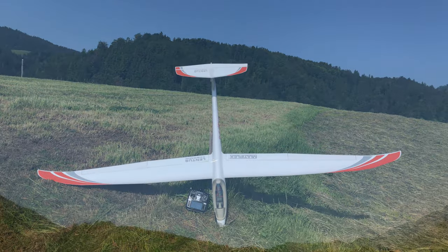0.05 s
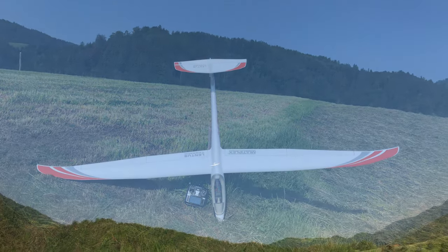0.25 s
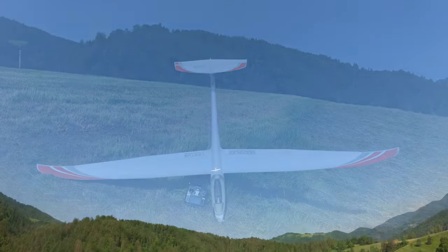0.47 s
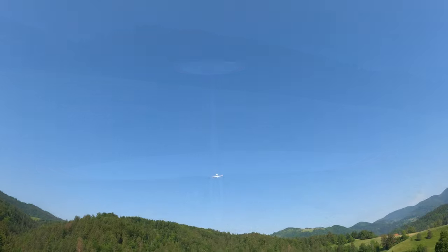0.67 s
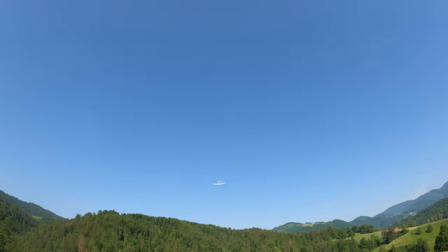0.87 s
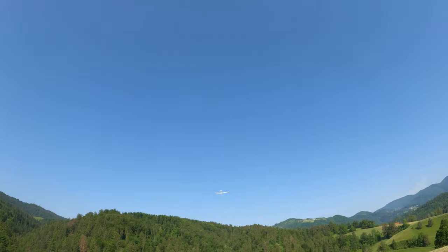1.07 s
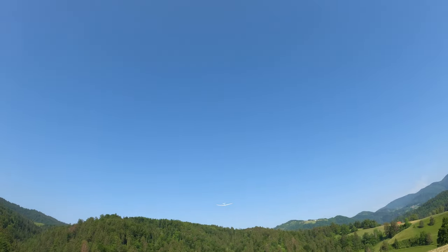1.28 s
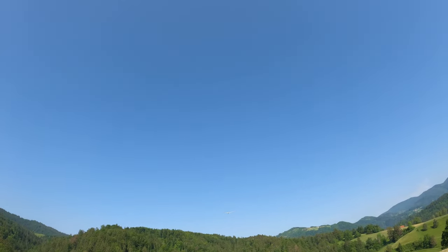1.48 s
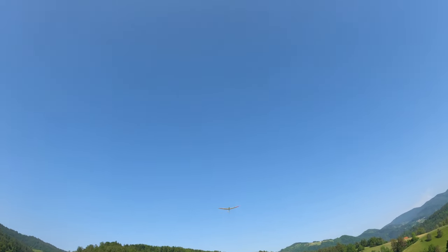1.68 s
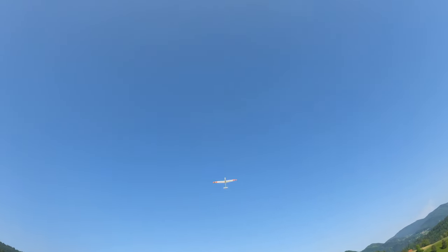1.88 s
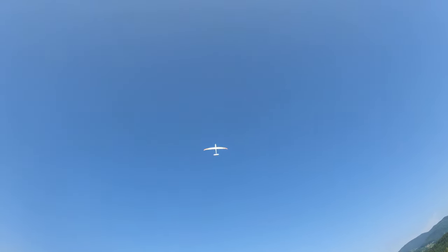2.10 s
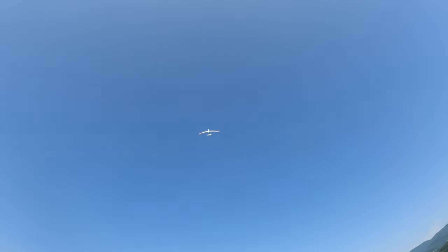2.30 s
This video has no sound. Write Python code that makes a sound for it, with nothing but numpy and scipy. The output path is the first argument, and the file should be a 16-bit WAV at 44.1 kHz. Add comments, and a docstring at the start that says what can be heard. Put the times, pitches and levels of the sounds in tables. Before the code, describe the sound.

A model glider's airy whistle rises and falls as it passes, over wind and chirping insects.

```python
"""Model glider over a meadow

A model glider dives toward the microphone and passes overhead. Its wings rush and air
whistles across its gaps, rising with speed, then falling as it goes by. Insects chirp and
tick in the summer grass, a far bird calls once, and wind buffets the microphone."""
import sys
import numpy as np
from scipy import signal
from scipy.fft import rfft, irfft
from scipy.io import wavfile
from scipy.ndimage import uniform_filter1d

SR = 44100
rng = np.random.default_rng(int(sys.argv[2]) if len(sys.argv) > 2 else 0)


def file_out(sig):
    """Save sig as 16-bit WAV at sys.argv[1]."""
    # one column per channel
    cols = np.atleast_2d(sig).T
    # limit, then scale
    lim = np.clip(cols, -1, 1)
    pcm = np.round(lim * 32767).astype(np.int16)
    wavfile.write(sys.argv[1], SR, pcm)


N = 108045
TIME = np.arange(N) / SR


def amp(db):
    """Turns decibels into a gain."""
    return 10 ** (np.asarray(db) / 20)


def unit(x):
    """Scales a signal to an average power of 1."""
    return x / np.sqrt(np.mean(abs(x) ** 2) + 1e-20)


def colour(points, hz):
    """Reads a table of (frequency, value) along a logarithmic frequency axis."""
    known_hz, values = np.transpose(points)
    return np.interp(np.log(hz + 1), np.log(known_hz), values)


def pan(db):
    """Left and right gains that make the left side db louder."""
    return amp(np.array([[db], [-db]]) / 2)


def pair(noises, same):
    """Makes two noises partly alike, from unrelated (0) to identical (1)."""
    return np.array([noises[0], same * noises[0] + np.sqrt(1 - same ** 2) * noises[1]])


def flutter(width_hz):
    """A smooth random wobble, as complex numbers: the wider its band, the faster it moves."""
    pole = np.exp(-np.pi * width_hz * 1.55 / SR)
    noise = rng.standard_normal(N + 4096) + 1j * rng.standard_normal(N + 4096)
    return unit(signal.lfilter([1], [1, -2 * pole, pole * pole], noise)[-N:])


def tone(hz, amplitude):
    """A tone that follows a pitch curve."""
    return np.sqrt(2) * (amplitude * np.exp(2j * np.pi * np.cumsum(hz) / SR)).real


def breathy_tone(hz, width_hz, noisy):
    """A tone that is part pure, part narrow noise; noisy is the noise's share, 0 to 1."""
    return tone(hz, np.sqrt(1 - noisy) + np.sqrt(noisy) * flutter(width_hz))


def add(mix, centre_s, sound):
    """Mixes a sound in, centred on a time."""
    start = round(centre_s * SR) - len(sound) // 2
    sound = sound[max(-start, 0):]
    part = mix[max(start, 0):][:len(sound)]
    part += sound[:len(part)]


def whistle(curve, tones, waver=0.00193):
    """Tones (pitch ratio, gain [dB], width [Hz], noise share) on one wavering pitch curve."""
    times, pitches, levels = np.transpose(curve)
    hz = np.interp(TIME, times, pitches) * (1 + waver * flutter(30).real)
    outside_s = abs(TIME - np.clip(TIME, times[0], times[-1]))
    level = amp(np.interp(TIME, times, levels) - 370 * outside_s)  # fades fast beyond both ends
    return level * sum(amp(db) * breathy_tone(hz * ratio, width, noisy)
                       for ratio, db, width, noisy in tones)


def bird():
    """One faint falling note, blurred by distance."""
    # The slurred note: (time [s], base pitch [Hz], level [dB])
    note = [(.12, 2820, -49), (.145, 2590, -48), (.165, 2387, -50.5), (.22, 2380, -59)]
    return whistle(note, [(0.99, 0.01, 140, 0.15)])


def chirp(hz, second_db, third_db, fall_hz_per_s=20500, width_s=0.0053):
    """One stroke of an insect's wing: a short falling note with two faint overtones."""
    t = np.arange(-700, 700) / SR
    phase = 2 * np.pi * (np.cumsum(hz - fall_hz_per_s * t) / SR + rng.random())
    note = np.sin(phase) + amp(second_db) * np.sin(2 * phase) + amp(third_db) * np.sin(3 * phase)
    return np.exp(-(t / width_s) ** 2 / 2) * note


def far_insects(level_db=-48.5, gap_s=.034, blur_hz=130):
    """Four distant insects keep chirping, each at its own pitch and uneven pace."""
    chorus = np.zeros((2, N))
    for k, hz in enumerate(np.linspace(4373, 4853, 4)):
        gaps, sizes = 1 + .3 * rng.standard_normal((2, 100))
        times = gap_s * (np.cumsum(gaps) - rng.random())
        for s, size in zip(times, sizes):
            add(chorus[k % 2], s, size * chirp(hz, second_db=-25.5, third_db=-34))
    grass_scatter = np.array([flutter(blur_hz), flutter(blur_hz)])
    blurred = (signal.hilbert(chorus) * grass_scatter).real
    fade_in = np.minimum(0.19 + TIME / .35, 1)
    return amp(level_db) * unit(blurred + 0.21 * blurred[::-1]) * fade_in  # sides mix a little


def near_insect(pitch_hz=4618, gap_s=.032, swell_db=4.5):
    """One insect close by on the left strokes its wings in swelling phrases."""
    # Phrases of chirps: (first chirp [s], last chirp [s], relative level [dB])
    phrases = [(0.096, 0.149, -45), (0.359, 0.426, -47), (0.658, 0.783, -36.5), (1.121, 1.23, -35),
               (1.44, 1.533, -35.5), (1.882, 1.914, -39), (2.127, 2.248, -35.5), (2.384, 2.438, -40)]
    song = np.zeros(N)
    for first, last, db in phrases:
        times = np.linspace(first, last, round((last - first) / gap_s) + 1)
        for s, place in zip(times, np.linspace(-1, 1, len(times))):
            level = amp(db - swell_db * min(place, 0) ** 2)  # grows until mid-phrase
            add(song, s, level * chirp(pitch_hz, second_db=-31, third_db=-41))
    return pan(6.5) * amp(1) * song


def bush_cricket(pitch_hz=11600, step_hz=500, band_hz=900, width_s=.003):
    """Brief, very high rasps on the left that step up in pitch midway and scatter in the grass."""
    # Ticks: (time [s], relative level [dB])
    ticks = [(.235, -61), (.661, -56), (.697, -51), (.729, -49), (.768, -53), (1.024, -52), (1.057, -49),
             (1.091, -45.5), (1.132, -49), (1.448, -54), (1.483, -49), (1.522, -47), (2.055, -54),
             (2.14, -53), (2.195, -54)]
    t = np.arange(-1500, 1500) / SR / width_s  # time from a tick's centre, in widths
    grass_tail = amp(-17) * (t > 0) * np.exp(-abs(t) / 10)
    envelope = np.exp(-t * t / 2) + grass_tail
    hz = pitch_hz + step_hz * np.tanh(2 * t)
    rasps = pair([flutter(band_hz), flutter(band_hz)], same=0.3)
    out = np.zeros((2, N))
    for channel, rasp in zip(out, rasps):
        for k, (s, db) in enumerate(ticks):
            add(channel, s, amp(db) * envelope * tone(hz, rasp[k * len(t):][:len(t)]))
    return pan(11) * amp(-4) * out


def wind_rumble(lump_db=2, lump_hz=30, eddy_hz=150):
    """Wind on the microphone: a lumpy rumble whose small swirls (eddies) brighten it in gusts."""
    # Gusts: (time [s], relative level [dB], left minus right [dB])
    gusts = [(0, -34.5, -5), (.12, -27, -4), (.24, -24, -5.5), (.35, -25.5, -4.5), (.47, -21, -.5),
             (.58, -18, 1.5), (.68, -22.5, 2.5), (.76, -18.5, -1), (.84, -22.5, 4), (.98, -21.5, 0.5),
             (1.07, -26, -3), (1.27, -22.5, -2.5), (1.42, -17, -4.5), (1.53, -19, -6), (1.68, -24.5, 3),
             (1.86, -21.5, 3.5), (2.08, -26.5, 1), (2.3, -25, 1), (2.45, -28.5, -3)]
    # Tone of the rumble: (frequency [Hz], relative level [dB])
    spectrum = [(10, -12), (25, -1), (42, -0.5), (70, -4), (115, -9), (170, -17), (250, -27), (400, -50.5),
                (900, -62), (3000, -97)]
    gains = amp(colour(spectrum, np.fft.rfftfreq(N, 1 / SR)))
    noise = irfft(rfft(rng.standard_normal((2, N))) * gains, N)
    times, level_db, side_db = np.transpose(gusts)
    level = np.array([amp(np.interp(TIME, times, level_db + side * side_db / 2)) for side in (1, -1)])
    lumps = amp(lump_db * unit(flutter(lump_hz).real))
    air = unit(pair(noise, same=0.69) * lumps)
    eddies = signal.sosfiltfilt(signal.butter(2, eddy_hz, "high", fs=SR, output="sos"), air)
    eddy_gain = np.sqrt(level / amp(-21.5))  # small eddies grow faster than the gust
    return level * (air - eddies + eddies * eddy_gain)


def wind_buffets(steepen=1.2, suction=0.49, bass_cut_hz=14.8):
    """Thumps of air on the microphone: the stronger, the steeper the push and the deeper the pull."""
    # Thumps: (time [s], width [s], relative level [dB], left minus right [dB])
    thumps = [(0.213, 0.0025, -10.5, -7.5), (0.281, 0.0037, -13.5, -9), (0.395, 0.0046, -9, -2),
              (0.482, 0.011, -8.5, -8), (0.613, 0.0029, -7, -6), (0.737, 0.0018, -10, 7.5),
              (1.009, 0.0037, -9.5, -7.5), (1.116, 0.0042, -8, -5), (1.176, 0.0034, -5, -9),
              (1.314, .005, -6, -4), (1.367, 0.0067, -7, -12), (1.412, 0.0028, 2, -7),
              (1.496, 0.0036, -3, -4), (1.534, 0.0028, -7.5, -2), (1.613, 0.0025, -6, -9)]
    pressure = 0
    for s, width_s, db, side_db in thumps:
        t = (TIME - s) / width_s  # time in widths
        onset = .5 + .5 * np.tanh((t + 1) * (1 + steepen * amp(db)))
        push = np.exp(-t * t / 2) * onset
        pull = suction * amp(db) * np.exp(-(t - 2.6) ** 2 / 2)
        pressure = pressure + pan(side_db) * amp(db) * (push - pull)
    return signal.lfilter(*signal.butter(1, bass_cut_hz, "high", fs=SR), pressure)


def air_rush(level_db=-34, patch_db=1.5):
    """Churning air hisses, growing brighter as the glider comes close."""
    # Four bands, each taken relative to its own peak:
    # (time [s], low [dB], middle [dB], upper [dB], treble [dB])
    swell = [(0, -66, -52, -67.5, -76.5), (0.55, -51.5, -42, -52.5, -63.5), (0.96, -52.5, -44, -46.5, -58),
             (1.01, -53, -42, -43.5, -54), (1.81, -51.5, -41.5, -38, -42.5), (1.88, -44, -38, -37.5, -43),
             (2.051, -47.5, -38.5, -45.5, -48), (2.11, -42.5, -39.5, -51, -48.5),
             (2.35, -49, -39, -55, -52.5), (2.45, -47, -45, -62.5, -53.5)]
    # Where those bands lie: (frequency [Hz])
    bands_hz = [550, 1100, 3500, 6500]
    # Overall tone of the hiss: (frequency [Hz], relative level [dB])
    spectrum = [(150, 0.5), (400, -5), (650, -7), (950, 0.5), (1400, -2), (2200, 1), (2900, -2.5),
                (4000, -4.5), (5500, -11), (7400, -19), (8600, -29), (11500, -31.5), (15000, -54)]
    frame_s = np.arange(N // 256 + 5) * 256 / SR
    hz = np.fft.rfftfreq(1024, 1 / SR)
    times, *bands = np.transpose(swell)
    levels = np.array([np.interp(frame_s, times, band - band.max()) for band in bands]).T
    grid_db = np.array([colour(list(zip(bands_hz, row)), hz) for row in levels])  # time by frequency
    real, imaginary = rng.standard_normal((2, 2) + grid_db.shape)
    # Random louder and softer patches, smoothed over time and then over frequency
    patches = uniform_filter1d(rng.standard_normal(grid_db.shape), size=10, axis=0)
    patches = unit(uniform_filter1d(patches, size=8, axis=1))
    gains = amp(grid_db + colour(spectrum, hz) + patch_db * patches)
    frames = pair(real + 1j * imaginary, same=0.91) * gains
    _, hiss = signal.istft(frames.transpose(0, 2, 1), nperseg=1024, noverlap=768)
    return amp(level_db) * unit(hiss[:, :N])


def wing_eddies(spread=.07, wander=.014, wander_hz=5):
    """The wings shed swirls of air: nine fuzzy tones that glide together, each wandering a little."""
    # Middle of the cluster: (time [s], pitch [Hz])
    pitch = [(0, 1486), (.55, 1778), (.9, 1865), (1.15, 1992), (1.42, 2087), (1.85, 1988), (2.03, 1823),
             (2.2, 1580), (2.45, 1337)]
    # Loudness of the cluster: (time [s], level [dB])
    loudness = [(0, -61), (.2, -45), (.42, -38.5), (.58, -35.5), (.8, -31), (1.05, -29.5), (1.38, -30.5),
                (1.56, -51), (1.7, -35), (1.86, -28), (2.03, -28), (2.14, -35), (2.45, -46)]
    hz = np.interp(TIME, *np.transpose(pitch))
    cluster = 0
    for offset in np.linspace(-2, 2, 9):
        ratio = 1 + spread * offset + wander * flutter(wander_hz).real
        weight = np.exp(-offset ** 2 / 4)
        cluster = cluster + weight * breathy_tone(hz * ratio, width_hz=22.8, noisy=0.83)
    return unit(cluster) * amp(np.interp(TIME, *np.transpose(loudness)))


def rising_whistles():
    """Air blows across the glider's gaps, whistling higher as the dive gains speed."""
    # Each whistle: (time [s], base pitch [Hz], relative level [dB])
    main = [(.97, 2727, -55), (1.02, 2738, -31), (1.14, 2783, -31), (1.2, 2795, -28.5), (1.39, 2845, -27.5),
            (1.5, 2948, -32.5), (1.62, 3006, -38.5), (1.87, 2934, -42)]
    early = [(.57, 2417, -47.5), (.7, 2480, -39.5), (.8, 2500, -47), (.94, 2523, -40), (1.02, 2634, -45),
             (1.2, 2670, -42)]
    low = [(0, 1410, -52), (.25, 1480, -50.5), (.49, 1667, -48), (.54, 1686, -35), (.63, 1737, -34),
           (.73, 1833, -45)]
    below_main = [(1.04, 2495, -37), (1.159, 2534, -40.5), (1.249, 2575, -34.5), (1.409, 2615, -32.5),
                  (1.53, 2763, -38)]
    above_main = [(1.0, 2980, -42), (1.2, 3010, -42.5), (1.3, 3120, -38), (1.39, 3100, -35)]
    brief_high = [(1.02, 5500, -58), (1.06, 5560, -48), (1.12, 5620, -48), (1.16, 5640, -57)]
    thin = sum(whistle(curve, [(0.99, 0.0047, 23, 0.29)])
               for curve in (early, low, below_main, above_main))
    # Tones of the main whistle: (pitch ratio, gain [dB], width [Hz], noise share [0-1])
    main_tones = [(1, -1.5, 30, 0.38), (1.384, -15, 40, 0.67), (1.014, -6.5, 49, 0.73)]
    return thin + whistle(main, main_tones) + whistle(brief_high, [(0.98, 0.0056, 100, 0.98)])


def falling_whistles():
    """Air whistles over gaps and edges, dropping in pitch as the glider goes by."""
    # Each whistle: (time [s], base pitch [Hz], relative level [dB])
    overhead = [(1.4, 1850, -53), (1.51, 1804, -37), (1.59, 1810, -47), (1.67, 1802, -35),
                (1.76, 1746, -33), (1.85, 1726, -38)]
    leaving = [(1.81, 3230, -58), (1.845, 3227, -26.5), (1.9, 3267, -36.5), (1.94, 3139, -31),
               (2.0, 3080, -28), (2.12, 2918, -33), (2.25, 2802, -36.5), (2.45, 2690, -39.5)]
    low_edge = [(1.9, 4514, -62), (1.98, 4320, -45), (2.1, 3870, -46), (2.2, 3600, -48), (2.33, 3340, -52),
                (2.45, 3140, -65)]
    high_edge = [(1.75, 5620, -52), (1.83, 5520, -39), (1.88, 5425, -55), (1.93, 5280, -40.5),
                 (2.02, 5000, -43.5), (2.13, 4610, -48), (2.28, 4210, -44), (2.45, 3690, -50)]
    sizzle = [(1.74, 7550, -57), (1.84, 7400, -43), (1.91, 7150, -50.5), (1.99, 6950, -43.5),
              (2.08, 6540, -49.5), (2.2, 6020, -73)]
    return (whistle(overhead, [(1, 0.01, 68, 0.51)])
            + whistle(leaving, [(1, 0, 71, 0.082)], waver=0.0018)
            + whistle(low_edge, [(1, 0, 50, 0.92)])
            + whistle(high_edge, [(1, 0, 110, 0.53)])
            + whistle(sizzle, [(1, -3.5, 170.5, 0.96), (1.045, -5.5, 260, 0.96)]))


def microphone_ports(sound):
    """Sound reaches the microphone's two openings with slightly different timing and level."""
    # How far the left side leads: (frequency [Hz], phase [radians])
    lead = [(300, 0.93), (900, -0.54), (1800, 0.84), (3000, -1), (4400, -1.5), (8000, 0.2)]
    # Which side is louder: (frequency [Hz], left minus right [dB])
    balance = [(500, -4), (1000, 0.5), (2000, -1.5), (3000, -1), (5000, -1), (8000, 1), (12000, 5.5)]
    hz = np.fft.rfftfreq(N, 1 / SR)
    left = amp(colour(balance, hz) / 2) * np.exp(.5j * colour(lead, hz))
    return irfft(rfft(sound) * np.array([left, 1 / left]), N)


def glider():
    """All the sounds of air passing the glider, as they reach the microphone."""
    return microphone_ports(rising_whistles() + falling_whistles() + wing_eddies() + air_rush())


def scene():
    """The glider over the meadow, in stereo."""
    return (glider() + near_insect() + far_insects() + bush_cricket() + bird()
            + wind_rumble() + wind_buffets())


def record(dry, top_hz=14800):
    """The strongest buffet overloads the recorder, which also cuts off the highest treble."""
    limited = dry / (1 + dry ** 20) ** (1 / 20)
    low_pass = signal.firwin(301, top_hz, window=("kaiser", 9), fs=SR)
    return signal.oaconvolve(limited, low_pass[None], "same")


dry = scene()
out = record(dry)
file_out(out)
```